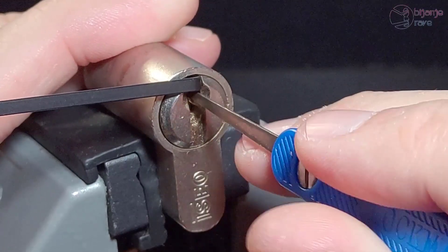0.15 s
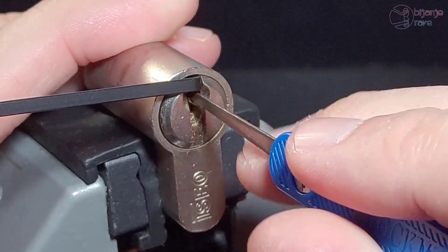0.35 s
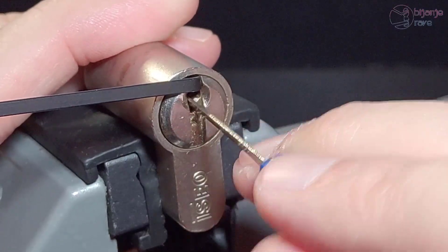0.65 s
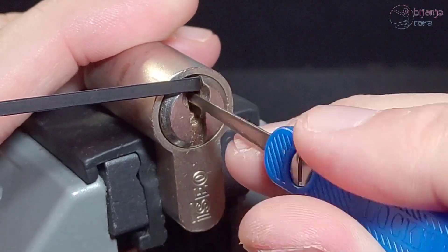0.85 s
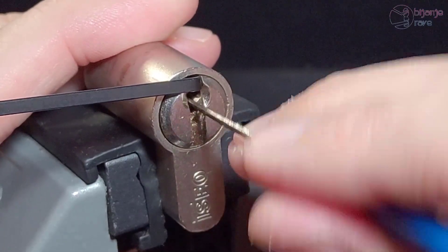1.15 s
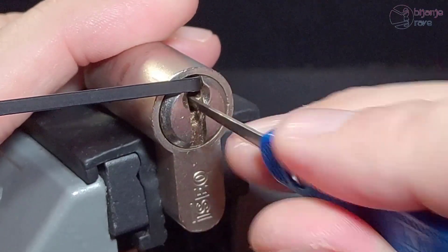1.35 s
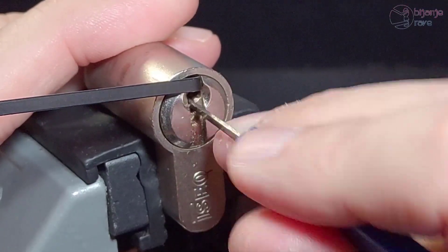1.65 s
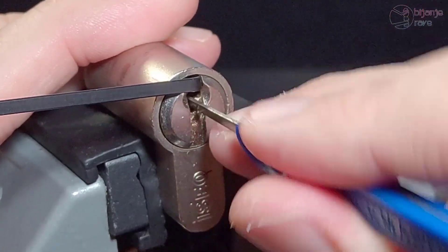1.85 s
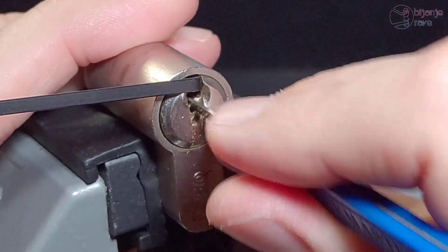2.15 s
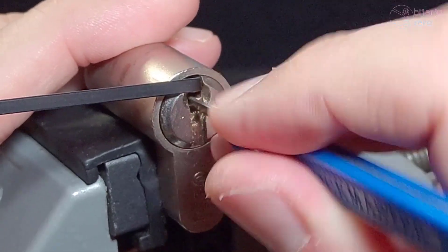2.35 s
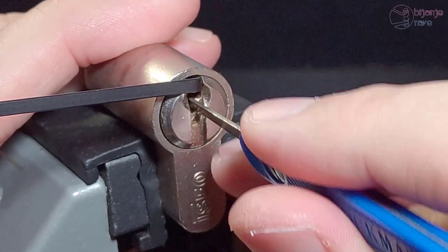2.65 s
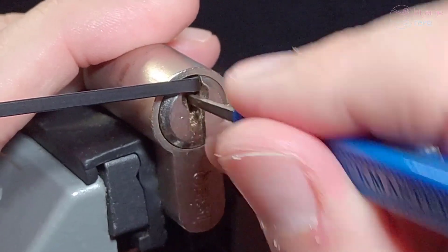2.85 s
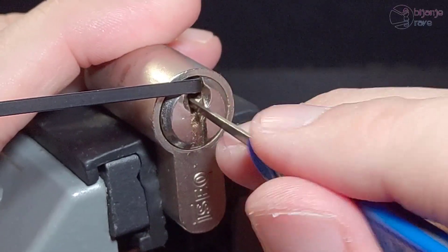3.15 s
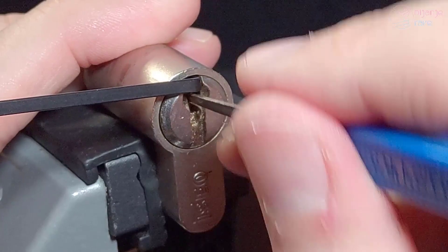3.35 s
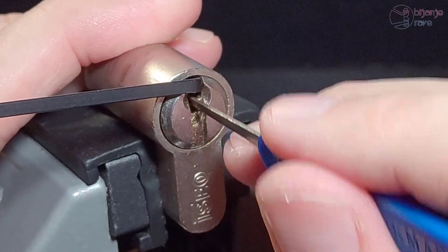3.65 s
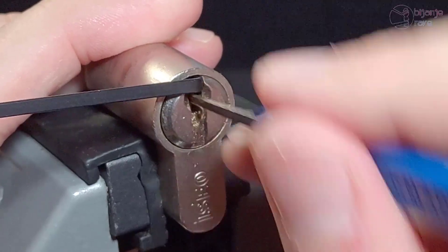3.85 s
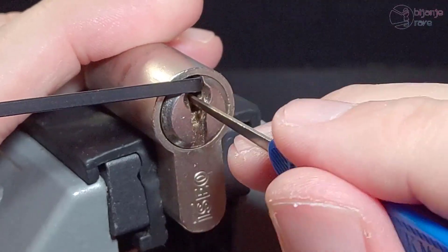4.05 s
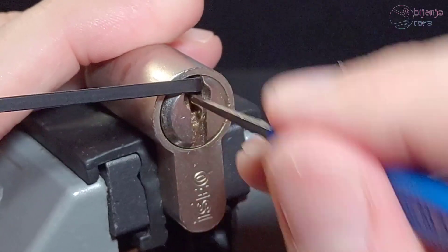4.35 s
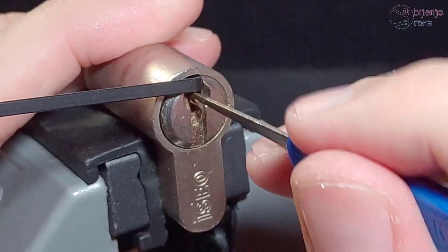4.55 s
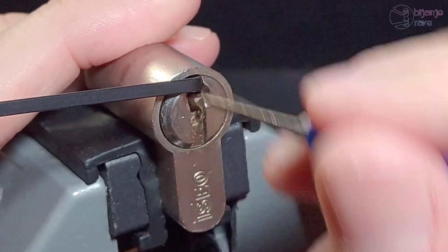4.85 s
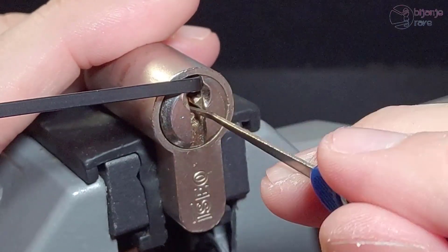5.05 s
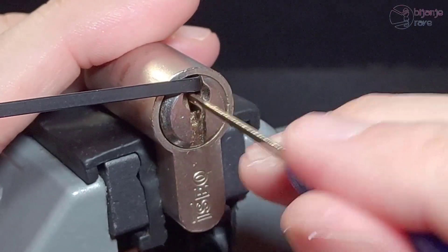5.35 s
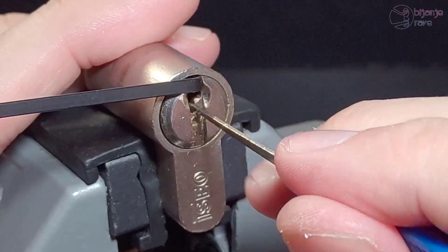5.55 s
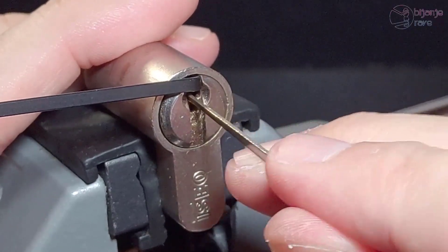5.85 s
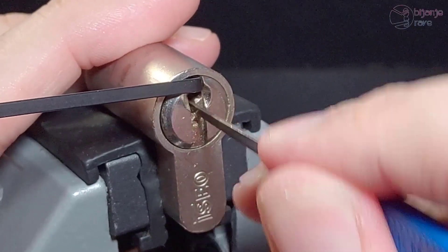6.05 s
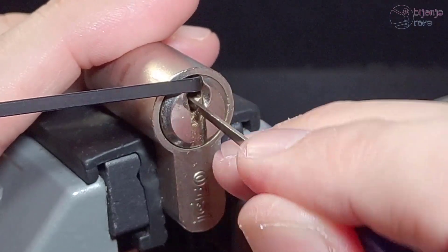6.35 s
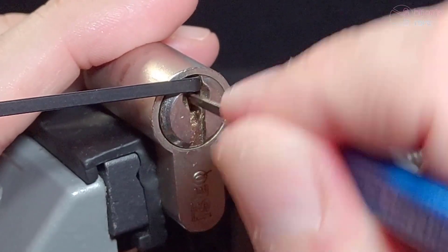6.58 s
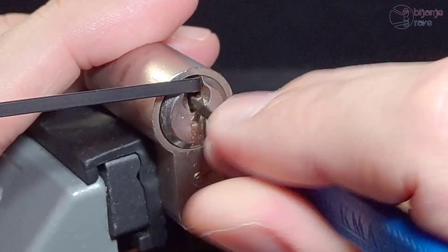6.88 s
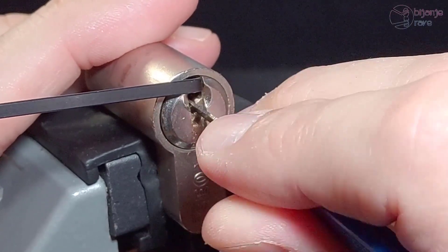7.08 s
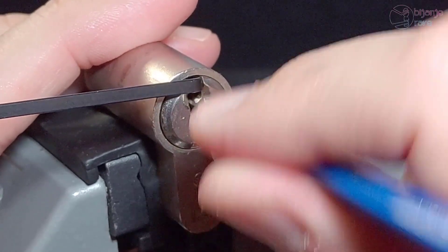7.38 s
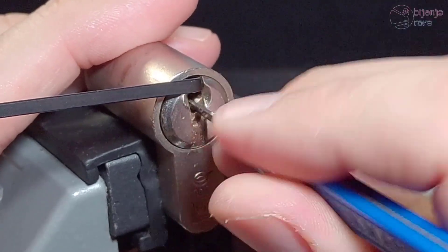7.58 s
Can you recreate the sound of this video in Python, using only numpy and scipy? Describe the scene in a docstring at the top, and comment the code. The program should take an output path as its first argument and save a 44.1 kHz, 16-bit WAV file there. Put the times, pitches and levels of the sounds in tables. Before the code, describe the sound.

Irregular sharp metallic clicks and faint scrapes of a pick inside a metal lock cylinder, close up in a quiet, softly rumbling room.

```python
"""Low room rumble, soft hiss and a faint hum come first, then a pick working the pins of a metal lock cylinder.
The lock sits in a small vise close to the microphone, in a quiet room. Each stroke of the pick pushes the
vise and table, then scrapes the keyway in tiny slips; one slide also squeaks. Taps and loud snaps of
bound pins ring the cylinder's modes for a few milliseconds, with near echoes and a short room tail."""
import sys
import numpy as np
from scipy import signal
from scipy.io import wavfile
from scipy.ndimage import uniform_filter1d

SR = 44100
rng = np.random.default_rng(int(sys.argv[2]) if len(sys.argv) > 2 else 0)


def wrap_up_sound(samples):
    """Save the sound to the file named by the first command line argument, as 16-bit audio."""
    columns = np.atleast_2d(samples).T
    # keep every value between -1 and 1, then stretch to whole-number steps
    tamed = np.clip(columns, -1, 1)
    steps = np.round(tamed * 32767).astype(np.int16)
    wavfile.write(sys.argv[1], SR, steps)


N = 340452  # length in samples

# Spectrum of the room's own noise: pitch_hz, relative_level_db (density per Hz)
AIR_SPECTRUM = [(11, -32), (18, -4), (48, -2), (61, -7), (76, -9), (194, -18.5), (250, -19), (371, -23),
                (427, -23), (492, -26.5), (653, -26.5), (842, -30), (4590, -41), (12400, -45.5),
                (15500, -51)]
# Decay of the room's tail: pitch_hz, t60_s
ROOM_DECAY = [(250, 0.22), (700, .2), (1800, 0.24), (4500, 0.14), (7500, .145), (13000, 0.14)]
# Tone balance of the room's tail: pitch_hz, relative_level_db
ROOM_COLOUR = [(450, -0.5), (900, 0), (1800, 1.5), (3500, 3.5), (5000, -1), (7500, -2), (13000, -2)]
# First echoes from the table and near things: nominal_delay_s, level_db
NEAR_ECHOES = [(.0014, -8), (.0023, -11), (.0034, -9.5), (.0062, -20.5), (0.0106, -25)]
# Modes of the table: pitch_hz, relative_level_db, t60_s
TABLE_MODES = [(123.7, -5, 0.3), (79, -6.5, 0.059), (200, -6, 0.045)]
# Modes of the vise: pitch_hz, relative_level_db, t60_s
VISE_MODES = [(327.8, -3, 0.047), (405, -5, 0.084), (451.3, -5, 0.17), (560, -2.5, .07), (633, -2, 0.062),
              (706, -8.5, 0.028), (779, 0.5, 0.1), (860, 1, .06), (940, -1, 0.046), (1134, -9, 0.024),
              (1456, -19, .08), (1520, -14, .08)]
# Hard jolts of the clamped lock: start_s, level_db, centre_hz (where the vise rings most)
JOLTS = [(.134, -54, 626), (1.109, -56, 720), (1.913, -51.5, 460), (3.378, -58, 580), (3.996, -51, 460),
         (4.447, -55.5, 497.4), (4.516, -42, 790), (4.901, -53, 544), (4.971, -55, 480),
         (6.258, -44.5, 730), (6.2948, -29, 710)]
# Pick strokes along the keyway, each begun by a push: start_s, length_s, scrape_db (before a trim), push_db
STROKES = [(.634, .07, -66, -62.5), (.843, 0.034, -66.5, -57.5), (1.28, 0.025, -76, -60.5),
           (1.407, 0.069, -66.5, -61), (1.531, 0.053, -68, -66), (1.765, 0.04, -62, -57),
           (2.243, .025, -71.5, -60), (2.297, 0.067, -68, -57), (2.42, 0.18, -60, -62),
           (2.812, .04, -66, -78), (3.32, .095, -66, -72), (3.93, 0.11, -54, -72),
           (4.455, 0.061, -48.5, -62), (4.905, 0.061, -54, -68), (5.42, 0.026, -63.5, -62.5),
           (5.6, 0.044, -61, -64), (5.735, 0.044, -63.5, -59), (5.955, .042, -59.5, -56.5),
           (6.145, 0.043, -74, -61.5), (6.584, 0.063, -64, -69), (6.739, 0.035, -61, -60),
           (6.86, 0.052, -63, -66.5), (7.428, 0.028, -62, -55.5)]
# One squeak of the sliding pick: start_s, length_s, pitch_hz, level_db
SQUEAK = (7.452, .05, 5900, -64)
# Modes of cylinder, pins and pick: pitch_hz, level_in_band_db (relative), t60_s
LOCK_MODES = [(1222, -5, 0.0079), (1565, -5.5, 0.01), (1879, -4.5, .012), (2220, -6, .007),
              (2750, -7, .007), (3300, -5, 0.01202), (3460, -4.5, .014), (3570, -6.5, .014),
              (3880, -1, 0.021), (4112, -5, 0.0092), (4400, -8.5, .01), (4600, -1.5, .011),
              (4660, -3.5, 0.011), (5160, -1.5, 0.017), (6660, -6.5, 0.024), (6200, -1.5, .01),
              (6900, -3.5, 0.0099), (7240, 1, .008), (7480, 5.5, .007), (8050, -1, 0.01), (8230, 3.5, .007),
              (8780, 2.5, 0.0059), (9005, 1, 0.01), (9500, -6, .006), (10020, -1.5, .01),
              (10060, -6.5, .007), (11750, -2, .006), (12220, -1, 0.00504), (13200, -3.5, 0.0049),
              (13400, -3.5, 0.0018)]
# Edges of the bands that group the lock's modes: edge_hz
LOCK_BAND_EDGES = (1100, 3000, 4200, 5900, 8100, 11000, 16000)
# Where the cylinder radiates poorly, between two groups of modes: pitch_hz, sharpness_q
LOCK_NULL = (5800, 7.3)
# Pick taps on a pin: start_s, level_db, mode_hz (the one that stands out), lift_db
TICKS = [(0.133, -46, 10020, 27), (.9899, -60, 3880, 5), (1.2932, -59, 4600, 4), (1.452, -55.5, 3880, 10),
         (1.5021, -60, 7480, 3), (1.5569, -58.5, 1565, 13), (2.255, -58, 1879, 18), (2.3076, -58, 3880, 12),
         (2.432, -57, 6600, 10), (2.9557, -48.5, 3880, 14), (3.2576, -59, 8100, 11),
         (3.347, -51.5, 3880, 14), (3.3766, -39, 4526, 23.5), (3.934, -55, 3600, 11),
         (4.4044, -50, 4600, 9), (4.9683, -40.5, 6460, 29), (5.614, -51, 5160, 21),
         (5.634, -34.5, 5160, 22), (5.7462, -56, 4600, 9), (5.7581, -57, 8050, 12),
         (6.2609, -51.5, 6560, 8), (6.344, -50, 7830, 17.5), (6.5702, -52, 7230, 9), (6.597, -40, 7230, 26),
         (6.603, -41, 7140, 28), (6.6911, -61, 3880, 9), (6.8805, -58.5, 7480, 9), (6.9356, -59, 5160, 4),
         (7.441, -42.5, 3460, 23), (7.625, -58, 3900, 1)]
# Tone balance of a tap: pitch_hz, relative_level_db
TICK_COLOUR = [(1500, 3), (3000, -1), (5000, -0.5), (7200, -3), (9000, -9.5), (13000, -8)]
# Bound pins letting go, each favouring two modes:
# start_s, level_db, tilt_db_per_octave, low_mode_hz, low_lift_db, high_mode_hz, high_lift_db
SNAPS = [(1.9116, -18.5, 1, 4112, 19, 11750, 9), (2.5144, -21.5, -2.5, 3570, 28, 7140, 20),
         (3.9941, -12, 0, 4600, 7.5, 6620, 6.5), (4.4464, -26.5, -4, 5160, 6.5, 6500, 15),
         (4.5152, -22, -1, 3747, 25, 8990, 21.5), (4.8994, -20.5, 0.5, 1565, 19.5, 8230, 8.5),
         (6.2959, -22, 6, 1222, 8, 10020, 13.5)]
# Tone balance of a snap: pitch_hz, relative_level_db
SNAP_COLOUR = [(1500, -21), (2700, -20), (3800, -12.5), (4700, -5), (7200, 2.5), (9000, -13), (13000, -16)]


def amp(db):
    """Decibels to gain."""
    return 10 ** (np.asarray(db) / 20)


def evened(x):
    """Scales to rms 1."""
    return x / np.sqrt(np.mean(x ** 2) + 1e-20)


def sized(x, db, size):
    """Scales x so that its first `size` samples have the rms level db."""
    return amp(db) * x / np.sqrt(np.mean(x[:size] ** 2) + 1e-20)


def read(points, hz):
    """Reads a table of pitch_hz, value on a log-frequency axis."""
    point_hz, value = np.transpose(points)
    return np.interp(np.log(hz + 1), np.log(point_hz + 1), value)


def add(mix, start_s, sound):
    """Adds a sound into the mix at start_s, cut off at the mix's end."""
    part = mix[max(round(start_s * SR), 0):][:len(sound)]
    part += sound[:len(part)]


def dying_noise(size, t60_s):
    """White noise under an exponential decay."""
    t = np.arange(size) / SR
    return rng.standard_normal(size) * amp(-60 * t / t60_s)


def ringing(modes, rise_s, size, scatter=1):
    """One row per mode: a dying sine that swells while the contact lasts; scatter 0 sets them in step."""
    hz, db, t60_s = np.transpose(modes)[:, :, None]
    t = np.arange(size) / SR
    turns = hz * (t - rise_s) + scatter * rng.random(hz.shape)
    swell = 1 - np.exp(-(t / rise_s) ** 2)
    return amp(db - 60 * t / t60_s) * np.sin(2 * np.pi * turns) * swell


def air(noise_db=-51.5, hum_hz=49, hum_db=-63.5, patchy_db=2, patchy_below_hz=1200):
    """Room rumble that drifts in patches of pitch and time, smooth hiss above it, and a weak low hum."""
    hz, frames = np.fft.rfftfreq(4096, 1 / SR), N // 1024 + 6
    real, imag, patches = rng.standard_normal((frames, len(hz), 3)).T
    patches = uniform_filter1d(patches, size=24, axis=0)  # across pitch
    patches = evened(uniform_filter1d(patches, size=5, axis=1))  # across time
    patch_depth_db = patchy_db / (1 + (hz[:, None] / patchy_below_hz) ** 2)
    field_db = read(AIR_SPECTRUM, hz)[:, None] + patch_depth_db * patches
    spectrum = (real + 1j * imag) * amp(field_db)
    noise = signal.istft(spectrum, nperseg=4096, noverlap=3072)[1][:N]
    hum = np.sin(2 * np.pi * hum_hz * np.arange(N) / SR)
    return amp(noise_db) * evened(noise) + amp(hum_db) * evened(hum)


def room(x, onset_s=0.0044):
    """A short diffuse tail of shaped noise, each band dying at its own speed."""
    hz, t, z = signal.stft(rng.standard_normal(SR // 2), SR, nperseg=256)
    decay_db = read(ROOM_COLOUR, hz)[:, None] - 60 * t / read(ROOM_DECAY, hz)[:, None]
    tail = signal.istft(z * amp(decay_db), SR, nperseg=256)[1]
    tail *= 1 - np.exp(-(np.arange(len(tail)) / SR / onset_s) ** 2)
    return signal.fftconvolve(x, tail / np.linalg.norm(tail))[:N]


def reflected(x, wander=.12):
    """Adds the first echoes; their paths change from blow to blow as the hands move."""
    out = x.copy()
    for delay_s, db in NEAR_ECHOES:
        lag = max(round(delay_s * SR * (1 + wander * rng.uniform(-1, 1))), 1)
        out[..., lag:] += amp(db) * x[..., :-lag]
    return out


def table_thump(jolt_db, rise_s=0.004, weight_db=-55, share_db=-9.5):
    """The table's low modes ring under the hand's weight, plus a share of the jolt."""
    thump_db = 20 * np.log10(np.hypot(amp(weight_db), amp(jolt_db + share_db)))
    return sized(ringing(TABLE_MODES, rise_s, size=12000).sum(0), thump_db, size=1764)


def knocks(rise_s=0.0035, focus_db=9, focus_width_hz=200, rattle_db=-5, rattle_t60_s=.08):
    """Each jolt or push rings the vise round one pitch, rattles its plastic jaws and thumps the table."""
    out, hz = np.zeros(N), np.transpose(VISE_MODES)[0]
    jaws = signal.butter(2, (230, 1100), "band", fs=SR, output="sos")
    push_lag_s, push_hz = .013, 590  # a push reaches the vise late
    pushes = [(start_s + push_lag_s, push_db, push_hz) for start_s, _, _, push_db in STROKES]
    for start_s, jolt_db, centre_hz in list(JOLTS) + pushes:
        focus = amp(focus_db * np.exp(-((hz - centre_hz) / focus_width_hz) ** 2))
        vise = focus @ ringing(VISE_MODES, rise_s, size=12000)
        rattle = signal.sosfilt(jaws, dying_noise(len(vise), rattle_t60_s))
        jolt = evened(vise) + amp(rattle_db) * evened(rattle)
        add(out, start_s, sized(jolt, jolt_db, size=1764))
        add(out, start_s, table_thump(jolt_db))
    return out


def scrapes(slips_per_s=1000, spread_db=4, dull_hz=8500, vise_db=-12, trim_db=-1):
    """The sliding pick catches and slips; each tiny slip rings the lock and, through it, the vise."""
    out, hz = np.zeros(N), np.transpose(LOCK_MODES)[0]
    for start_s, length_s, db, _ in STROKES:
        n = max(round(length_s * SR), 64)
        sizes = amp(spread_db * np.minimum(rng.exponential(1, n), 4))
        happens = rng.random(n) < slips_per_s / SR
        slips = happens * rng.choice([-1, 1], n) * sizes * signal.windows.tukey(n, .5)
        dulling = 1 / (1 + (hz / dull_hz) ** 4)
        lock = dulling @ ringing(LOCK_MODES, .0001, size=4096)
        vise = amp(vise_db) * ringing(VISE_MODES, 0.0023, size=4096).sum(0)
        add(out, start_s, sized(signal.fftconvolve(slips, lock + vise), db + trim_db, size=n))
    return out


def squeak(width_hz=350):
    """The sliding pick's faint whistle: noise through one narrow resonance, faded in and out."""
    out = np.zeros(N)
    start_s, length_s, hz, db = SQUEAK
    n = round(length_s * SR)
    whistle = signal.lfilter(*signal.iirpeak(hz, hz / width_hz, fs=SR), rng.standard_normal(n))
    add(out, start_s, amp(db) * evened(whistle * signal.windows.tukey(n, .5)))
    return out


def radiated(parts):
    """Each group of modes sounds mainly within its own band, and all are notched at the lock's null."""
    null = signal.iirnotch(*LOCK_NULL, fs=SR)
    edge_pairs = zip(LOCK_BAND_EDGES, LOCK_BAND_EDGES[1:])
    bands = [signal.butter(2, edges, "band", fs=SR) for edges in edge_pairs]
    return signal.lfilter(*null, [signal.lfilter(*band, part) for band, part in zip(bands, parts)])


def favour(mode_hz, lift_db, width=0.04):
    """Extra dB for lock modes near the one a blow favours; width is a share of its frequency."""
    return lift_db * np.exp(-((np.transpose(LOCK_MODES)[0] / mode_hz - 1) / width) ** 2)


def struck(colour, extra_db, rise_s, scatter, chatter_db, chatter_t60_s):
    """One blow on the lock near unit level; colour and favoured modes share out its energy."""
    hz, mode_db, _ = np.transpose(LOCK_MODES)
    band = np.clip(np.searchsorted(LOCK_BAND_EDGES, hz) - 1, 0, len(LOCK_BAND_EDGES) - 2)
    share_db = read(colour, hz) + extra_db
    power = np.bincount(band, amp(mode_db + share_db) ** 2)
    band_db = 10 * np.log10(power / power.sum())
    # one hard blow, then the pin chatters as it seats
    chatter = dying_noise(512, chatter_t60_s)
    blow = np.arange(512) == 0
    force = blow + amp(chatter_db) * chatter / np.linalg.norm(chatter)
    # starting nearly in step, the modes add up to a spike before they drift apart
    modes = amp(share_db)[:, None] * ringing(LOCK_MODES, rise_s, size=2048, scatter=scatter)
    parts = np.array([modes[band == k].sum(0) for k in range(len(power))])
    parts = reflected(radiated(signal.fftconvolve(parts, force[None], axes=1)))
    return sum(sized(part, db, size=441) for part, db in zip(parts, band_db))


def ticks(rise_s=.0003, scatter=0.27, chatter_db=-9, chatter_t60_s=.012):
    """Light taps of the pick: a softer contact than a snap, with one lock mode lifted into a ping."""
    out = np.zeros(N)
    for start_s, db, mode_hz, lift_db in TICKS:
        lift = favour(mode_hz, lift_db)
        tap = struck(TICK_COLOUR, lift, rise_s, scatter, chatter_db, chatter_t60_s)
        add(out, start_s, amp(db) * tap)
    return out


def crack(snap_db, full_scale_db=11, growth=2.8, t60_s=0.016):
    """Toneless burst of metal on metal, falling `growth` dB for each dB that the snap is softer."""
    band = signal.butter(4, (4200, 14000), "band", fs=SR)
    burst = signal.lfilter(*band, dying_noise(1024, t60_s))
    return sized(burst, full_scale_db + growth * snap_db, size=441)


def snaps(rise_s=.00014, scatter=.23, chatter_db=-10, chatter_t60_s=.008, slip_lead_s=.0016, slip_db=-17.5):
    """A pin under tension slips a little, then snaps home with a crack: loud and bright."""
    out, hz = np.zeros(N), np.transpose(LOCK_MODES)[0]
    for start_s, db, tilt_db, low_hz, low_db, high_hz, high_db in SNAPS:
        extra_db = tilt_db * np.log2(hz) + favour(low_hz, low_db) + favour(high_hz, high_db)
        for when_s, level_db in ((start_s - slip_lead_s, db + slip_db), (start_s, db)):
            blow = struck(SNAP_COLOUR, extra_db, rise_s, scatter, chatter_db, chatter_t60_s)
            add(out, when_s, amp(level_db) * blow)
        add(out, start_s, crack(db))
    return out


def scene(lock_room_db=-15, vise_room_db=-9):
    """The lock and the vise close to the microphone, their tail in the room, and the room's own noise."""
    lock = snaps() + ticks() + scrapes() + squeak()
    vise = knocks()
    tail = room(amp(lock_room_db) * lock + amp(vise_room_db) * vise)
    return (lock + vise + tail + air())[None]


def record(dry, limit=.85, edge_hz=15900):
    """The recorder overloads, flattening any peak beyond its limit; then a low-pass limits the band."""
    held = np.clip(dry, -limit, limit)
    lowpass = signal.firwin(301, edge_hz, window=("kaiser", 8), fs=SR)
    return signal.oaconvolve(held, lowpass[None], "same")


dry = scene()
out = record(dry)
wrap_up_sound(out)
```